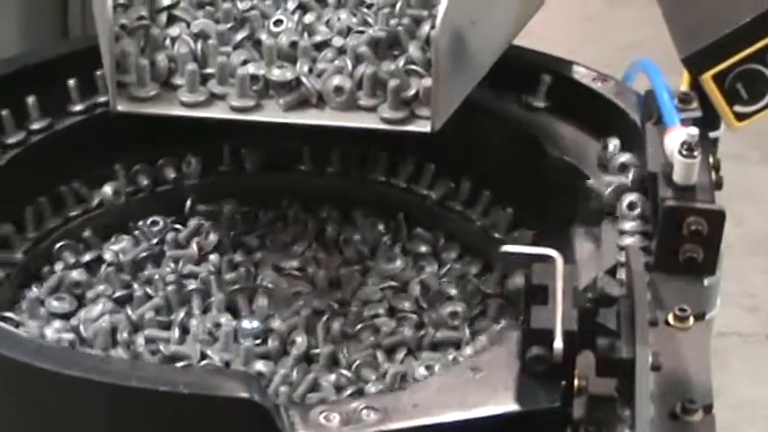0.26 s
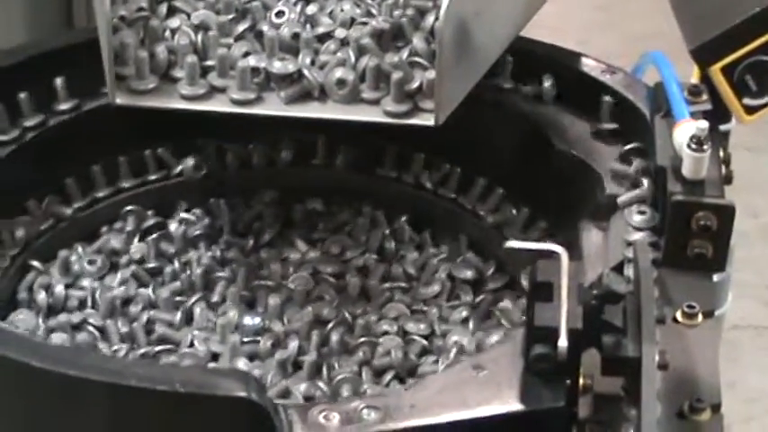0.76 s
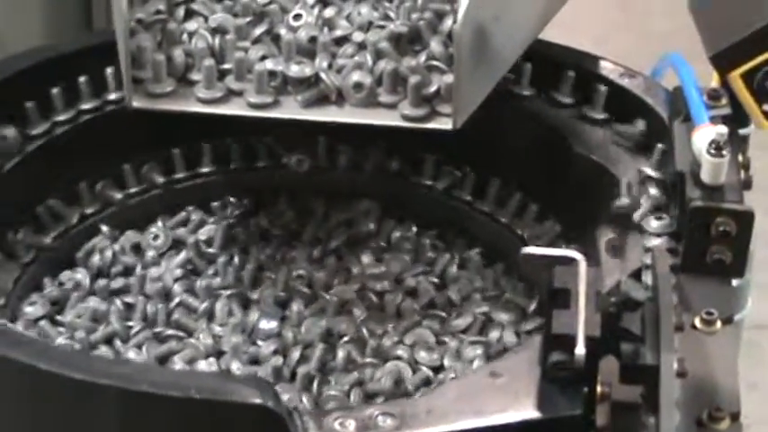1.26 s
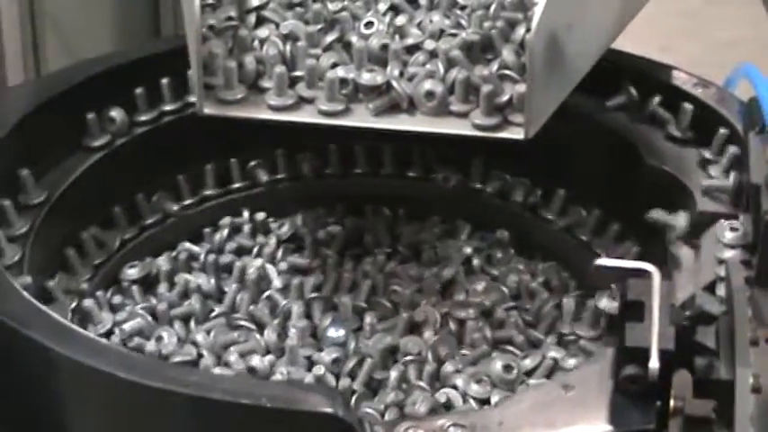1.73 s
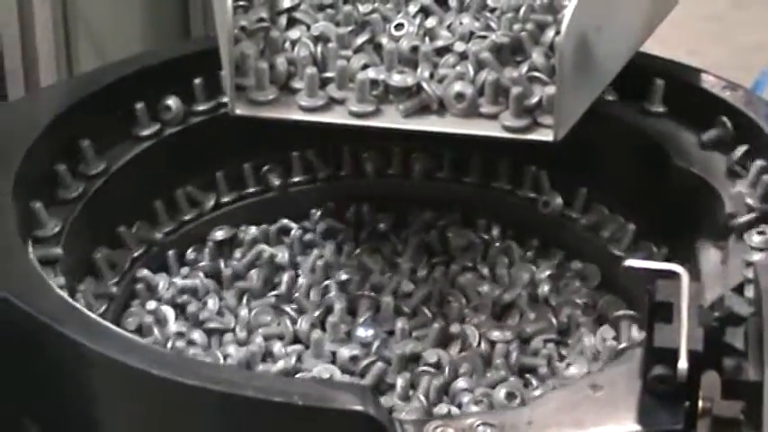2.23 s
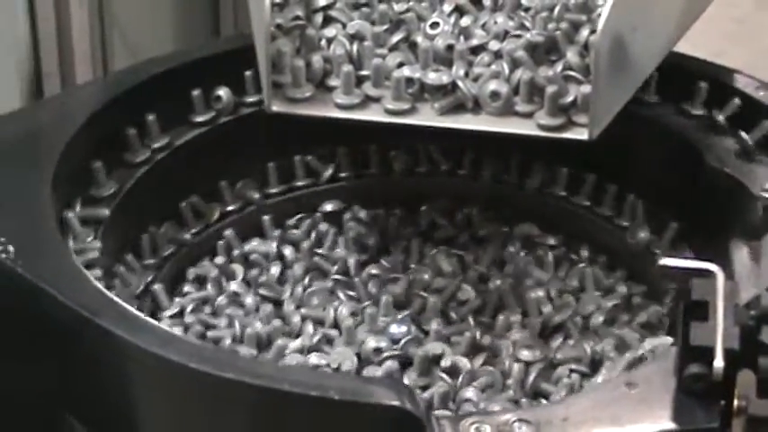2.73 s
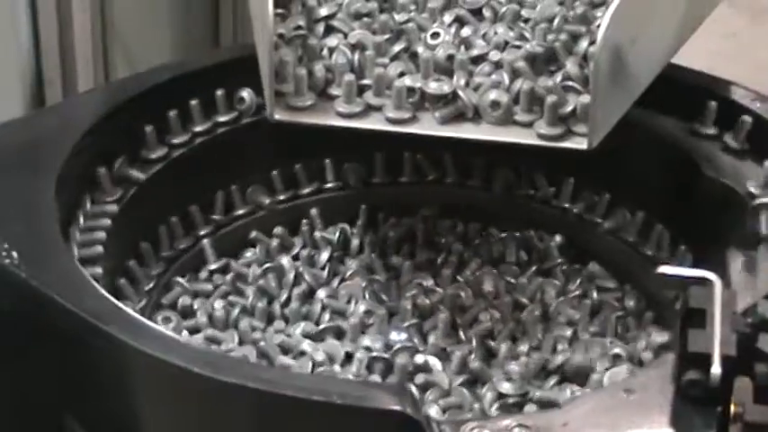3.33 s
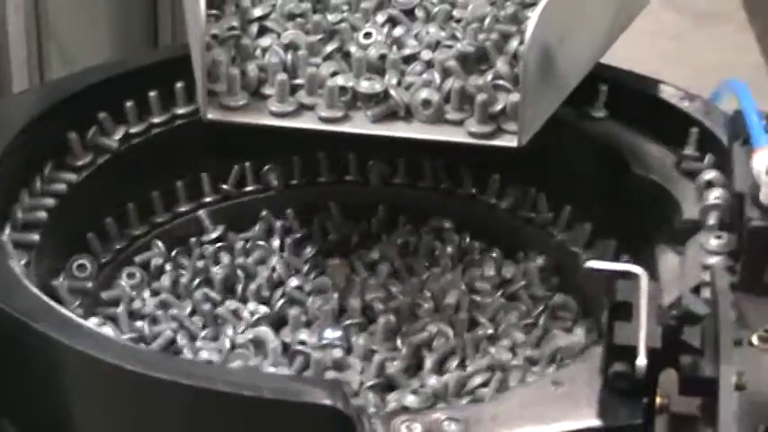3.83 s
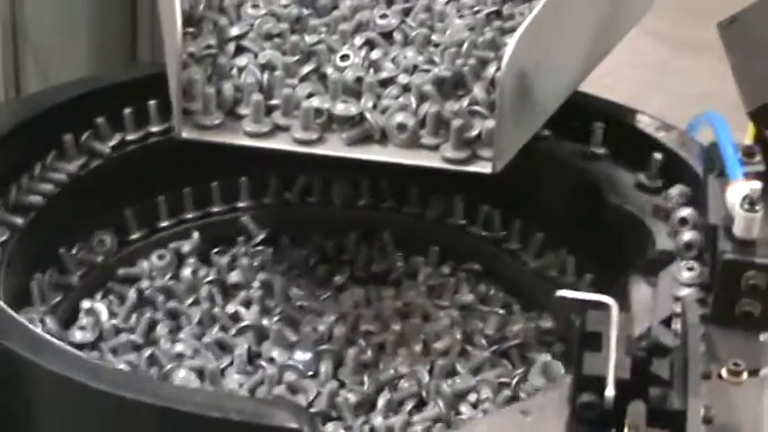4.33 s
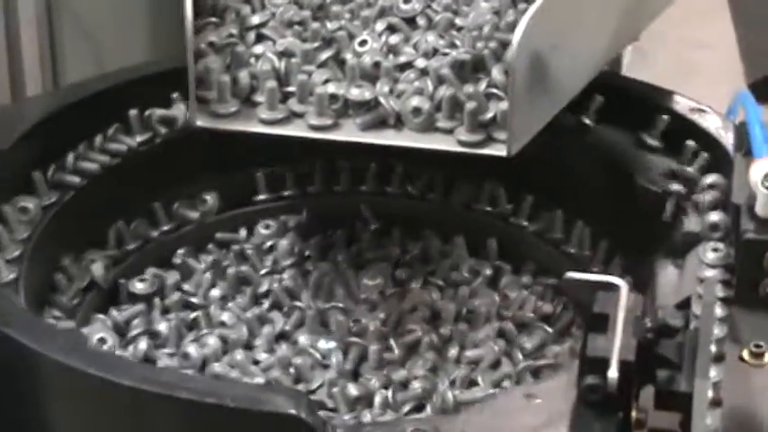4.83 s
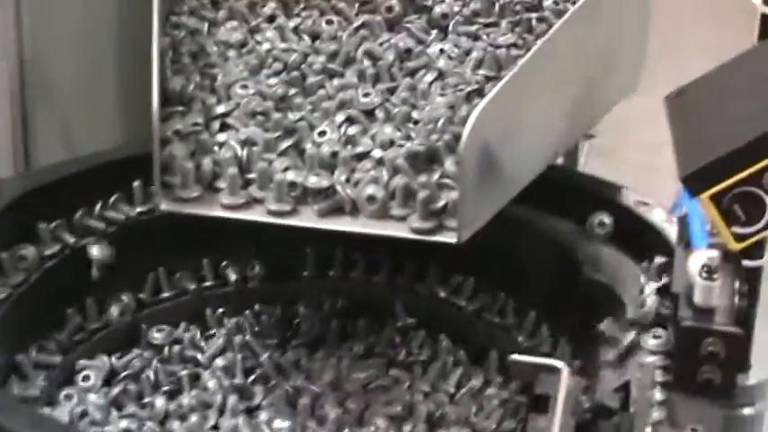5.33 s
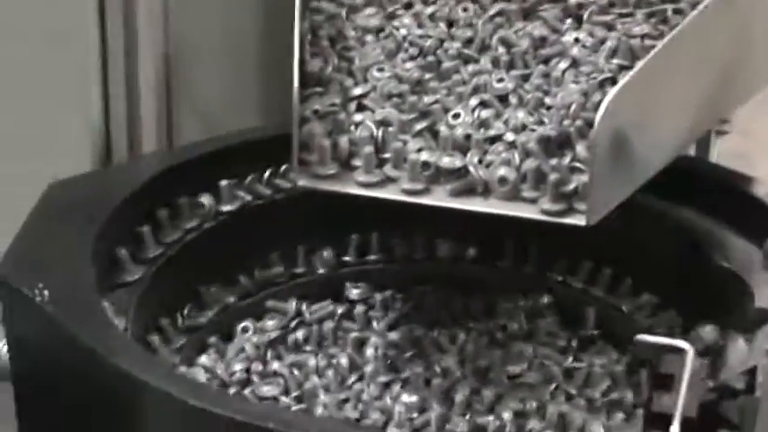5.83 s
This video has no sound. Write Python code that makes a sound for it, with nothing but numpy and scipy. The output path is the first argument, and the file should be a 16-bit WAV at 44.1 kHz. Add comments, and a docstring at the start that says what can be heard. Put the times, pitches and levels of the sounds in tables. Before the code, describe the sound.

A vibratory feeder hums and rattles with small steel screws while air hisses; twice a shrill falling whistle of vented air precedes a slide's knock.

```python
"""In a workshop, a vibratory bowl feeder hums on the mains while steel screws rattle in it.
Hum is a sum of mains multiples; rattle is random impacts, coloured or rung through bowl resonances.
Compressed air, as shaped noise, hisses at the outlet over a low rumble. Twice a valve vents with a shrill,
falling pair of tones, and the slide then knocks on its stop, as noise ringing in decaying modes; one faint
knock comes between. A limiter ducks the whole scene under each whistle."""
import sys
import numpy as np
from scipy import signal
from scipy.fft import rfft, irfft, next_fast_len
from scipy.io import wavfile
from scipy.ndimage import uniform_filter1d, minimum_filter1d

SR = 44100
rng = np.random.default_rng(int(sys.argv[2]) if len(sys.argv) > 2 else 0)


def store_pcm(level_fs):
    """Save levels as 16-bit WAV."""
    pcm = np.round(np.clip(level_fs, -1, 1) * 32767).astype(np.int16)
    wavfile.write(sys.argv[1], SR, np.atleast_2d(pcm).T)


N = 268569
TIME_S = np.arange(N) / SR

# Rumble of frame and workshop. Each row: frequency in Hz, density in dB per Hz (relative).
RUMBLE = [(20, -20), (40, -12), (58, 1), (80, -4.5), (110, 2.5), (148, 1.5), (195, -12.5), (250, -14),
          (310, -15.5), (400, -3.5), (520, -3.5), (750, -7), (1200, -18)]
# Jet colour. Each row: frequency over jet centre (ratio), density in dB per Hz (relative).
JET_COLOUR = [(.15, -25), (.4, -5.5), (.62, -1.5), (.85, 4), (1.05, 5), (1.3, 1), (1.55, -6.5),
              (1.9, -10.5), (2.5, -13.5)]
# Outlet channel, a steep-edged band. Each row: frequency in Hz, density in dB per Hz (relative).
CHANNEL = [(3500, -14), (4400, -14.5), (4750, -1.5), (5700, -1), (6500, -4.5), (7100, 0.5), (7700, -13),
           (9000, -27), (13000, -29)]
# Air blasts. Each row: start in s, rise in s, hold in s, jet level in dB, channel level in dB,
# jet centre in Hz.
BLASTS = [(0.0, 0.0013, 0.29, -20.5, -29.5, 6700), (0.215, 0.085, 0.13, -27, -27.5, 5600),
          (1.302, 0.19, 0.44, -27.5, -29, 5300), (3.314, 0.01, 0.072, -31, -25, 6860),
          (3.438, 0.08, 0.21, -35, -33, 6500), (3.9, 0.36, 0.87, -36, -53, 5900)]
# Valve vents. Each row: start in s, whistle level in dB, fall of the lower tone in Hz per s,
# rush level in the jet in dB, rush level in the channel in dB.
VENTS = [(1.769, -3, 5190, -22.5, -36), (4.767, -5, 5750, -28, -29.5)]
# Short narrow hisses within the air. Each row: peak in s, level in dB, centre in Hz, length in s.
SPURTS = [(0.62, -28, 5640, 0.088), (1.95, -27, 9300, 0.039), (4.96, -29, 9130, 0.062)]
# Slide hitting its stop. Each row: time in s, level in dB, brightness in dB per octave.
KNOCKS = [(1.981, -15.5, -0.5), (2.008, -25, 2), (3.305, -33, -2), (5.003, -22, -2), (5.016, -20.5, -0.5),
          (5.034, -31, 0.5), (5.075, -29, 0)]
# Slide modes. Each row: frequency in Hz, relative level in dB, T60 in s.
SLIDE = [(148.6, -11.5, 0.38), (244, -5.5, 0.092), (287, -9.5, 0.15), (510, -4.5, 0.14), (756, -7.5, 0.049),
         (876, -5, 0.13), (1345, -9, 0.15), (1560, -2, 0.19), (1875, -1.5, 0.13), (2240, -7, 0.36),
         (2630, -10, 0.46)]
# Hollow ring as the slide moves the second time. One row: start in s, level in dB, frequency in Hz, T60 in s.
LOW_RING = (4.962, -33.5, 307.5, 0.6)
# Bowl swing, used about its mean. Each row: time in s, level in dB.
SWING = [(0, -0.5), (0.28, -3), (0.5, 0.8), (1.65, 3), (2.3, -1.3), (3.1, -0.4), (4.2, 1.9), (4.7, 2),
         (5.4, -2.5), (6.09, -1)]
# Hum of magnet and bowl. Each row: multiple of the mains frequency, level in dB before the swing gain.
HUM = [(1, -55), (2, -33), (3, -58), (4, -51), (5, -59), (6, -46.5), (7, -48.5), (8, -34.5), (9, -48.5),
       (10, -41), (12, -73), (13, -88), (14, -55), (16, -52), (18, -53)]
# Bowl wall modes. Each row: frequency in Hz, width per filter pass in Hz, relative level in dB.
WALL = [(194, 80, -2), (247, 76, -2), (420, 260, -2), (1074, 196, 3)]
# Bowl bottom modes. Each row: frequency in Hz, width per filter pass in Hz, relative level in dB.
BOTTOM = [(547.4, 167, 0.5), (631, 9.7, -6.5)]
# Heap shifts, drumming harder. Each row: peak in s, bass gain in dB, half length (to 1/e of the dB) in s.
SURGES = [(4.13, 4, 0.2), (4.774, 6.5, 0.17)]
# Colour of colliding screws. Each row: frequency in Hz, density in dB per Hz (relative).
SCREWS = [(400, -41), (700, -19), (900, -6.5), (1080, -7), (1300, -2), (2200, -4.5), (3200, -5), (4500, -1),
          (6000, 1), (8000, -1.5), (9600, -3.5), (11000, -9.5), (13000, -8), (15700, -13)]
# Bowl resonances knocked by screws. Each row: frequency in Hz, width in Hz, relative level in dB.
BOWL = [(1124, 110, -13.5), (1788, 79, -13), (2232, 170, -13), (6100, 92, -11)]
# Single screws tumbling. Each row: start in s, level in dB.
TUMBLES = [(.955, -28), (2.485, -31), (2.958, -38), (4.125, -25.5), (4.375, -27), (5.415, -25)]
# Microphone ports: treble ring, out of phase above it. Each row: frequency in Hz, mid in dB, side in dB.
PORTS = [(60, 2.5, -6), (110, -1, -23), (200, -1, -6), (567, 0.5, -10.5), (1310, -2, -7), (2330, 2, -23),
         (3450, 0.5, -10.5), (5000, -0.5, -16.5), (6940, -0.5, -20), (8680, 0.5, -11), (9650, 7.5, -1),
         (10410, 3, 3.5), (11300, 0, -14.5), (12000, -9, 11), (12700, -20, -4), (13940, -1, 0),
         (15000, -16.5, -16), (15900, 12.5, -28)]

MAINS_HZ, WORKSHOP_T60_S, CUTOFF_HZ = 59.99, 0.79, 15750
LEAK_JET_DB, LEAK_HZ = -41, 5940   # air that escapes all the time
BLEED_T60_S = 0.88   # air line emptying after each blast
WHISTLE_START_HZ, UPPER_FALL_HZ_PER_S = 7290, 2300
WHISTLE_ATTACK_S, WHISTLE_FADE_DB_PER_S, WHISTLE_LENGTH_S = 0.0035, 110, 0.36
START_ROUGH, FRAY_PER_S = 0.1375, 2.7   # roughness 0-1 and its growth
RUSH_DELAY_S, RUSH_RISE_S, RUSH_HOLD_S, RUSH_HZ = 0.066, 0.11, 0.013, 6360
KNOCK_PIVOT_HZ, SURGE_FADE_HZ = 700, 685   # modes above the latter feel a surge less
# level at mean swing, and dB gained per dB of swing
HUM_DB, HUM_DB_PER_DB = -0.1, 0.55
HEAP_DB, HEAP_DB_PER_DB = -34, 0.75
WALL_DB, WALL_DB_PER_DB = -51.5, 1.4
BOTTOM_DB, BOTTOM_DB_PER_DB = -46, 1.29


def from_db(db):
    """Decibels to gain."""
    return 10 ** (np.asarray(db) / 20)


def rms_one(x):
    """Scale to an rms of 1."""
    return x / np.sqrt(np.mean(x ** 2) + 1e-20)


def noise():
    """White noise, as mid and side."""
    return rng.standard_normal((2, N))


def colour(x, points):
    """Filter by a (Hz, dB) outline, interpolated over log frequency."""
    hz, db = np.transpose(points)
    size = next_fast_len(N)
    bins_hz = np.maximum(np.fft.rfftfreq(size, 1 / SR), 1)
    gain = from_db(np.interp(np.log(bins_hz), np.log(hz), db))
    return irfft(rfft(x, size) * gain, size)[..., :N]


def drift(rate_hz):
    """Smooth random curve of rms 1 that changes about rate_hz times a second."""
    step = 8   # computed on every 8th sample
    settle = 8000
    r = np.exp(-2 * np.pi * step * rate_hz / SR)
    raw = rng.standard_normal(N // step + settle + 2)
    slow = signal.lfilter([1], [1, -2 * r, r * r], raw)[settle:]
    return np.interp(np.arange(N) / step, np.arange(len(slow)), rms_one(slow))


def resonate(x, hz, width_hz):
    """One resonance with gain 1 on top."""
    r = np.exp(-np.pi * width_hz / SR)
    zeros = np.array([1, 0, -1]) * (1 - r * r) / 2
    poles = [1, -2 * r * np.cos(2 * np.pi * hz / SR), r * r]
    return signal.lfilter(zeros, poles, x + 1e-18)


def fall_db(age_s, t60_s):
    """Exponential decay in dB from age 0, down to -120 dB."""
    return -60 * np.clip(age_s / t60_s, 0, 2)


def decays(rows, t60_s):
    """Envelope that jumps up at each (s, dB) and dies away."""
    return sum((TIME_S >= s) * from_db(db + fall_db(TIME_S - s, t60_s)) for s, db in rows)


def workshop(x, build_s):
    """Diffuse reflections of unit energy: decaying noise that builds up first, as mid and side."""
    t = TIME_S[:SR]
    build = 1 - np.exp(-(t / build_s) ** 2)
    tail = rng.standard_normal((2, SR)) * from_db(-60 * t / WORKSHOP_T60_S) * build
    return signal.fftconvolve(x[None], rms_one(tail) / np.sqrt(SR), axes=1)[:, :N]


def rumble(level_db, flutter_db):
    """Low rumble of frame and workshop: coloured noise with a wavering level."""
    return from_db(level_db + flutter_db * drift(3.3)) * rms_one(colour(noise(), RUMBLE))


def airflow():
    """Leak, blasts and the rush after each whistle add in power: jet dB, channel dB, jet centre Hz."""
    rushes = [(s + RUSH_DELAY_S, RUSH_RISE_S, RUSH_HOLD_S, jet_db, channel_db, RUSH_HZ)
              for s, _, _, jet_db, channel_db in VENTS]
    jet_power, channel_power = from_db(LEAK_JET_DB) ** 2, 1e-12
    weighted_hz = jet_power * LEAK_HZ
    for s, rise_s, hold_s, jet_db, channel_db, hz in list(BLASTS) + rushes:
        opening = np.clip((TIME_S - s) / rise_s, 0, 1)
        flow = opening * from_db(fall_db(TIME_S - s - rise_s - hold_s, BLEED_T60_S))
        power = (from_db(jet_db) * flow) ** 2
        jet_power = jet_power + power
        weighted_hz = weighted_hz + power * hz
        channel_power = channel_power + (from_db(channel_db) * flow) ** 2
    return 10 * np.log10(jet_power), 10 * np.log10(channel_power), weighted_hz / jet_power


def jet(level_db, centre_hz, flutter_db):
    """Turbulent hiss whose whole spectrum slides with the speed of the air."""
    hz, frame_s, frames = signal.stft(noise(), SR, nperseg=512)
    ratio, db = np.transpose(JET_COLOUR)
    frame_ratio = hz[:, None] / np.interp(frame_s, TIME_S, centre_hz)
    gain = from_db(np.interp(frame_ratio, ratio, db))
    hiss = signal.istft(frames * gain, SR)[1][:, :N]
    return from_db(level_db + flutter_db * drift(22)) * rms_one(hiss)


def puffs(level_db, flutter_db):
    """Air rushing down the narrow outlet channel: band-shaped noise."""
    return from_db(level_db + flutter_db * drift(34)) * rms_one(colour(noise(), CHANNEL))


def spurts(width_hz):
    """Short narrow hisses swell and fade within the escaping air, each around its own pitch."""
    air, out = noise(), 0
    for s, db, hz, length_s in SPURTS:
        swell = 1 / np.cosh(np.clip((TIME_S - s) / length_s, -20, 20))
        out = out + from_db(db) * swell * rms_one(resonate(air, hz, width_hz))
    return out


def edge_tone(age_s, fall_hz_per_s, rough, wander_hz, jitter_hz):
    """Sine that sinks in pitch and strays with roughness."""
    stray_hz = rough * (wander_hz * drift(29) + jitter_hz * drift(520))
    hz = WHISTLE_START_HZ - fall_hz_per_s * age_s + stray_hz
    return np.sin(2 * np.pi * np.cumsum(hz) / SR)


def whistles(wander_hz, jitter_hz, flutter_db, room_db, lower_db):
    """Edge tones sink apart and fray as pressure falls, beating with their reflections; the lower fades in."""
    tone, flutter = np.zeros(N), drift(150)
    for s, db, lower_fall_hz_per_s, _, _ in VENTS:
        age_s = np.clip(TIME_S - s, 0, WHISTLE_LENGTH_S)
        valve = np.minimum(age_s / WHISTLE_ATTACK_S, 1) * (age_s < WHISTLE_LENGTH_S)
        rough = np.minimum(START_ROUGH + FRAY_PER_S * age_s, 1)
        level_db = db - WHISTLE_FADE_DB_PER_S * age_s + flutter_db * rough * flutter
        upper = edge_tone(age_s, UPPER_FALL_HZ_PER_S, rough, wander_hz, jitter_hz)
        lower = edge_tone(age_s, lower_fall_hz_per_s, rough, wander_hz, jitter_hz)
        pair = upper + from_db(lower_db) * rough * lower
        tone += valve * from_db(level_db) * np.sqrt(2) * pair
    return tone * [[1], [0]] + from_db(room_db) * workshop(tone, build_s=0.0047)


def slide(level_db, relative_width):
    """Each knock shakes clusters of close modes in the slide and its frame."""
    shake, out = noise(), 0
    for hz, db, t60_s in SLIDE:
        width_hz = relative_width * hz
        cluster = resonate(resonate(shake, hz, width_hz), hz, width_hz)
        octaves = np.log2(hz / KNOCK_PIVOT_HZ)
        blows = [(s, knock_db + tilt * octaves) for s, knock_db, tilt in KNOCKS]
        out = out + from_db(level_db + db) * decays(blows, t60_s) * rms_one(cluster)
    return out


def low_ring(attack_s):
    """A short hollow sine that swells and dies away, mid only."""
    s, db, hz, t60_s = LOW_RING
    envelope = decays([(s, db)], t60_s) * np.clip((TIME_S - s) / attack_s, 0, 1)
    return envelope * np.sqrt(2) * np.sin(2 * np.pi * hz * TIME_S) * [[1], [0]]


def swing():
    """Swing of the bowl in dB about its mean; drives hum and rattle."""
    s, db = np.transpose(SWING)
    curve_db = np.interp(TIME_S, s, db)
    return curve_db - curve_db.mean()


def collisions(per_s, spread_db, throb):
    """Random impacts (mid and side) that bunch up each time the bowl throws the screws."""
    mains_phase = 2 * np.pi * MAINS_HZ * TIME_S
    bunching = 1 + throb * np.cos(2 * mains_phase) + throb / 2 * np.cos(mains_phase)
    hits = rng.random(N) < per_s / SR * bunching
    sizes = from_db(spread_db * np.minimum(rng.exponential(1, N), 5))
    return rms_one(hits * sizes * rng.choice([-1, 1], (2, N)))


def wall(flutter_db):
    """The weight of the heap drums on the wall and the bottom of the bowl."""
    surge_db = sum(db * np.exp(-((TIME_S - s) / length_s) ** 2) for s, db, length_s in SURGES)
    wall_db = WALL_DB + WALL_DB_PER_DB * swing()
    bottom_db = BOTTOM_DB + BOTTOM_DB_PER_DB * swing()
    blows, out = collisions(per_s=2500, spread_db=1.5, throb=.3), 0
    for level_db, modes in ((wall_db, WALL), (bottom_db, BOTTOM)):
        for hz, width_hz, db in modes:
            mode_db = level_db + db + surge_db / (1 + (hz / SURGE_FADE_HZ) ** 2)
            drumming = rms_one(resonate(resonate(blows, hz, width_hz), hz, width_hz))
            out = out + from_db(mode_db + flutter_db * drift(17)) * drumming
    return out


def hum(waver_db, phase_waver_rad, side_db):
    """Magnet pulls twice per mains cycle; shifting load wavers each partial, standing waves spread it."""
    out = np.zeros((2, N))
    for multiple, db in HUM:
        cycles = multiple * MAINS_HZ * TIME_S + rng.random()
        phase = 2 * np.pi * cycles + phase_waver_rad * drift(1.5)
        side = from_db(side_db) * drift(.8) * np.cos(phase)
        out += from_db(db + waver_db * drift(3.7)) * np.array([np.sin(phase), side])
    return from_db(HUM_DB + HUM_DB_PER_DB * swing()) * out


def heap(screws_db, bowl_db, flutter_db, room_db):
    """Thousands of tiny clashes of screw on screw, and heavier ones that ring the bowl."""
    level_db = HEAP_DB + HEAP_DB_PER_DB * swing()
    clashes = rms_one(colour(collisions(per_s=13000, spread_db=1.84, throb=.08), SCREWS))
    blows, bowl = collisions(per_s=1300, spread_db=4.0, throb=.2), 0
    for hz, width_hz, db in BOWL:
        bowl = bowl + from_db(db + flutter_db * drift(9.1)) * rms_one(resonate(blows, hz, width_hz))
    tumbles = decays(TUMBLES, t60_s=0.2) * rms_one(colour(noise(), SCREWS))
    impacts = from_db(screws_db) * clashes + from_db(bowl_db) * bowl
    rattle = from_db(level_db) * impacts + tumbles
    return rattle + from_db(room_db) * workshop(rattle[0], build_s=0.019)


def stereo(mid_side, width_db, pan_db):
    """Mid and side through the two microphone ports to left and right; positive pan is left."""
    hz, mid_db, side_db = np.transpose(PORTS)
    mid = colour(mid_side[0], np.c_[hz, mid_db])
    side = colour(mid_side[1], np.c_[hz, side_db + width_db])
    return np.array([mid + side, mid - side]) * from_db([[pan_db / 2], [-pan_db / 2]])


def scene():
    """Bowl near the centre; outlet air wider and a little left; slide knocks farther left."""
    jet_db, channel_db, centre_hz = airflow()
    air = jet(jet_db, centre_hz, flutter_db=1.0)
    air += puffs(channel_db, flutter_db=0.5)
    air += spurts(width_hz=750)
    air += whistles(wander_hz=112.5, jitter_hz=466, flutter_db=5.0, room_db=-5.0, lower_db=2.0)
    knocks = slide(level_db=-7.5, relative_width=0.21) + low_ring(attack_s=0.023)
    feeder = rumble(level_db=-40.5, flutter_db=0.35)
    feeder += wall(flutter_db=1.2)
    feeder += hum(waver_db=0.28, phase_waver_rad=0.13, side_db=-12.0)
    feeder += heap(screws_db=6.5, bowl_db=0.5, flutter_db=0.5, room_db=-8.0)
    out = stereo(air, width_db=3.0, pan_db=2.0)
    out += stereo(knocks, width_db=0.0, pan_db=5.5)
    out += stereo(feeder, width_db=-3.5, pan_db=-0.1)
    return out


def limiter(x, ceiling_db, release_db_per_s):
    """Power over the ceiling pulls the gain down within about 2 ms; it then creeps back."""
    power = uniform_filter1d(np.mean(x ** 2, axis=0), size=111)
    over_db = np.maximum(10 * np.log10(np.abs(power) + 1e-12) - ceiling_db, 0)
    release_db = release_db_per_s * TIME_S
    held_db = np.maximum.accumulate(over_db + release_db) - release_db
    gain_db = uniform_filter1d(minimum_filter1d(-held_db, size=89), size=89)
    return x * from_db(gain_db)


def record(dry):
    """Limiter, then a steep cut of the top."""
    limited = limiter(dry, ceiling_db=-12.0, release_db_per_s=46.0)
    low_pass = signal.ellip(12, .1, 90, CUTOFF_HZ, fs=SR, output="sos")
    return signal.sosfilt(low_pass, limited)


dry = scene()
out = record(dry)
store_pcm(out)
```